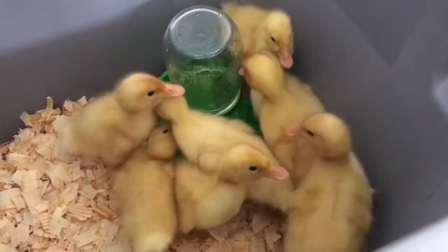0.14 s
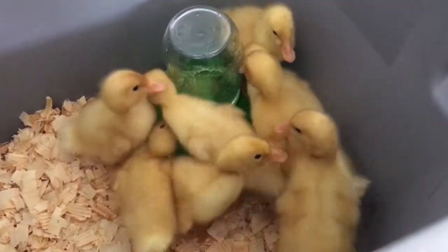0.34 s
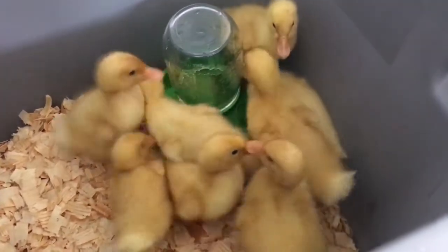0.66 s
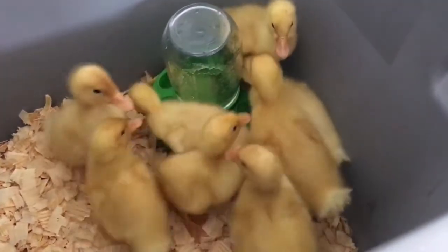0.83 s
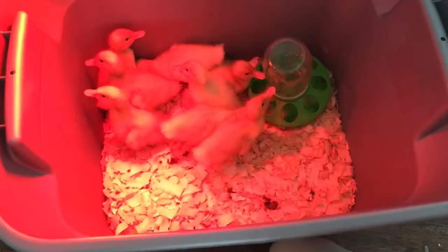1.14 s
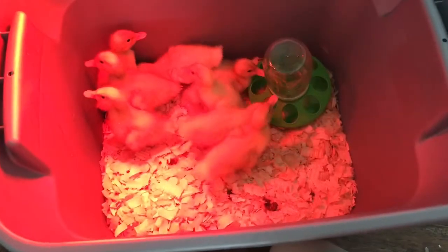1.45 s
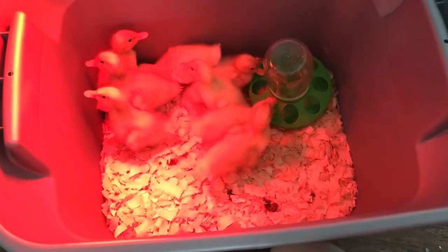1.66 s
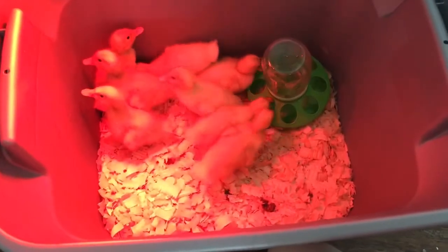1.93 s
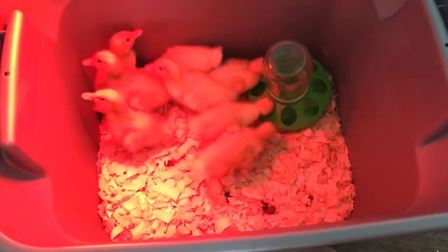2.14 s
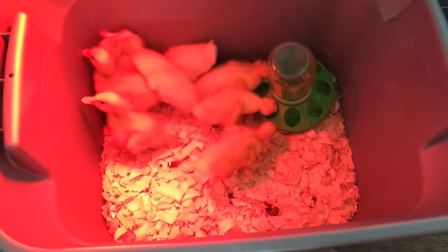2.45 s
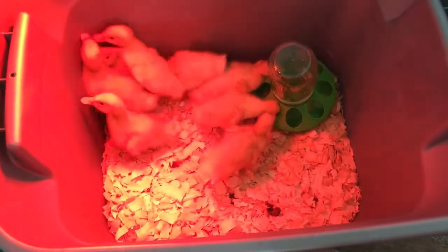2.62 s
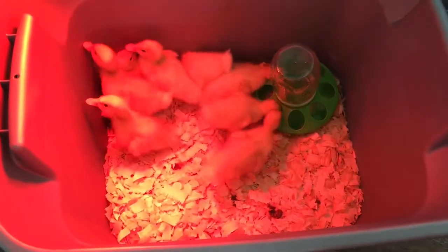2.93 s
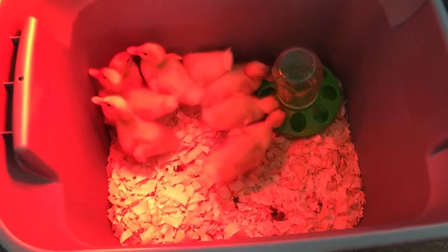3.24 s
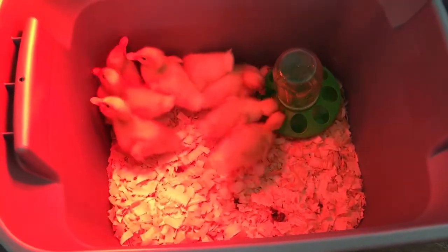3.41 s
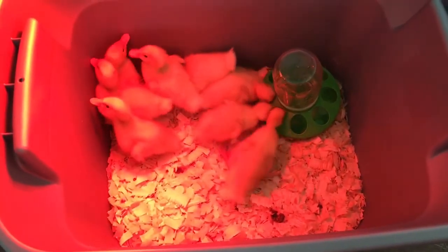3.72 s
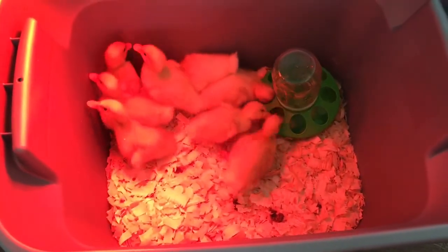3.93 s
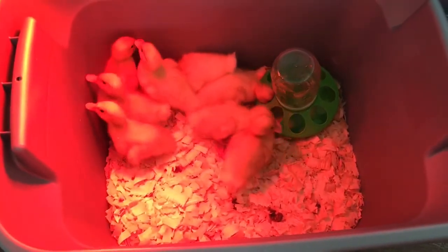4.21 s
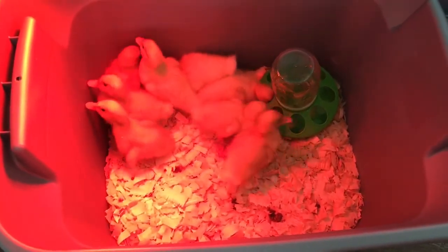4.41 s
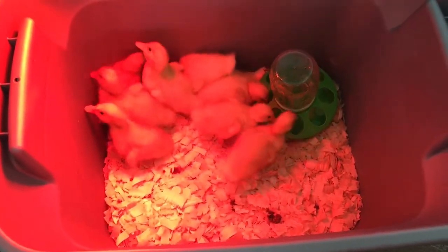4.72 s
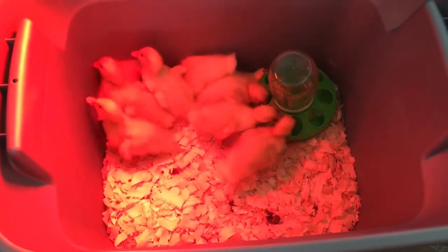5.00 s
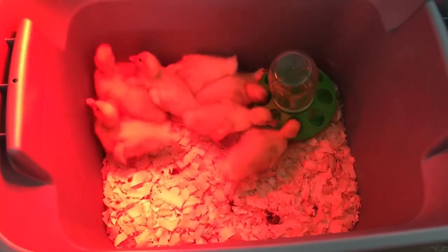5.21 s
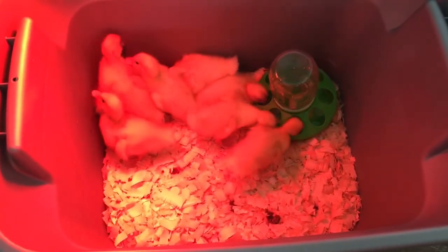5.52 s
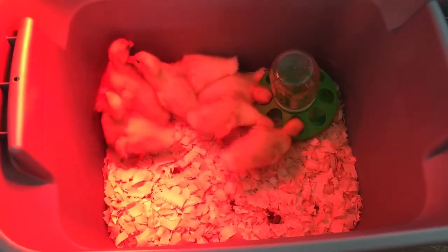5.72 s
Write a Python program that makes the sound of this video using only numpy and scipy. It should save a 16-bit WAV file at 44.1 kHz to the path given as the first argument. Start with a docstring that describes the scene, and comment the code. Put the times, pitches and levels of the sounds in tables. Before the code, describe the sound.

Close view into a plastic tub of ducklings. About nine short, high peeps come quickly in the first second, then it falls nearly quiet with faint rustles. A bright, loud peep sounds around 2.5 seconds among weaker ones, with bill taps on a drinker. Afterwards small snaps, pecks and soft foot bumps dominate, over faint hiss and low rumble.

```python
"""Ducklings peep, each call one short arch of pitch, while they shuffle on wood shavings in a plastic tub.
The calls are swept harmonics that flare at a bill resonance. Bills tap a drinker (ringing modes),
feet thump the tub floor (sinking booms), shavings swish (grains of noise), and shavings snap and
bills peck the tub wall (rung bursts).
Tub echoes and a diffuse tail surround calls and knocks, over faint hiss and a rumble wandering in level."""
import sys
import numpy as np
from scipy import signal
from scipy.fft import rfft, irfft
from scipy.io import wavfile
from scipy.ndimage import uniform_filter1d

SR = 44100
rng = np.random.default_rng(int(sys.argv[2]) if len(sys.argv) > 2 else 0)


def to_wav(sig):
    """Store sig (one row per channel, or 1-D mono) as 16-bit WAV at the path in sys.argv[1].

    Samples outside -1..1 are clipped; the rate is SR.
    """
    pcm = np.clip(np.atleast_2d(sig), -1, 1) * 32767
    pcm = np.round(pcm).astype(np.int16)
    wavfile.write(sys.argv[1], SR, pcm.T)  # frames by channels


N = 258426

# All table levels are relative: the functions add trims, and tone tables give only a spectral shape.
# spectrum of the dry shavings, also lent to the breath in a call: (frequency [Hz], level [dB])
SHAVING_TONE = [(300, 4.5), (900, 9.5), (2000, 9), (3700, 5.5), (5000, 3), (6400, 5), (9000, 3),
                (10400, -1.5), (12000, 0.5), (16000, -4.5)]
# notes of the chips, large to small: (frequency [Hz])
CHIP_NOTES = [1300, 2100, 3100, 4200, 5300, 6500, 8000, 9600, 12500]
# shavings rustling as the brood shifts: (time [s], level [dB])
RUSTLE_CURVE = [(0.0, -58.5), (0.23, -66.5), (0.42, -58.5), (0.7, -56.5), (0.86, -49.5), (1.01, -60.5),
                (1.05, -76.5), (1.39, -63), (1.7, -70), (2.17, -71.5), (2.28, -62), (2.77, -60),
                (3.23, -66), (3.4, -60.5), (4.15, -64), (4.72, -60.5), (5.4, -65.5), (5.86, -62.5)]


def amp(db):
    """Decibels to gain."""
    return 10 ** (np.asarray(db) / 20)


def unit(x):
    """Scales to rms 1."""
    return x / np.sqrt(np.mean(x ** 2) + 1e-20)


def unit_hit(x):
    """Scales a hit so that its loudest 4 ms have rms 1."""
    power = uniform_filter1d(x ** 2, size=176, mode="constant")
    return x / np.sqrt(power.max() + 1e-20)


def read(points, hz):
    """Reads a table of (frequency [Hz], value) on a log-frequency axis."""
    f, value = np.transpose(points)
    return np.interp(np.log(hz + 1), np.log(f + 1), value)


def follow(curve):
    """Turns a curve of (time [s], level [dB]) into a gain for every sample."""
    return amp(np.interp(np.arange(N) / SR, *np.transpose(curve)))


def colour(x, tone):
    """Shapes the spectrum of x by a (frequency [Hz], level [dB]) table, at rms 1."""
    gain = amp(read(tone, np.fft.rfftfreq(len(x), 1 / SR)))
    return unit(irfft(rfft(x) * gain, len(x)))


def ring(x, hz, width_hz):
    """One resonance of peak gain 1."""
    b, a = signal.iirpeak(min(hz, SR * .45), hz / width_hz, SR)
    return signal.lfilter(b, a, x)


def add(mix, s, sound):
    """Adds a sound into the mix at time s [s]."""
    part = mix[max(round(s * SR), 0):][:len(sound)]
    part += sound[:len(part)]


def grains(per_s, spread_db, t60, bed):
    """Noise in tiny dying bursts of uneven size, over an even bed of noise."""
    size_db = np.minimum(spread_db * rng.exponential(1, N), 13)
    size = amp(size_db) * (rng.random(N) < per_s / SR)
    decay = amp(-120 / (t60 * SR))  # power falls 60 dB in t60 seconds
    power = signal.lfilter([1], [1, -decay], size ** 2)
    return np.sqrt(power / power.mean() + abs(bed)) * rng.standard_normal(N)


def peep(row, jitter=0.075, flutter_db=6, rasp=0.94, breath_db=-24, third_db=-3, slack_db=-21,
         fade=0.041, swell_db=4, bill_sag_hz=150):
    """The syrinx sweeps up and down; the note flares as it passes the resonance of the open bill."""
    # what the throat and bill let through: (frequency [Hz], level [dB])
    throat = [(1700, -17), (2400, -8.5), (2900, -9.5), (3450, -2), (3700, -4), (4000, -19), (4700, -16.5),
              (6000, -4.5), (7200, -12.5), (9000, -24), (11500, -20), (15000, -45)]
    (_, length, top, arch, start_hz, top_hz, end_hz, level_db,
     bill_hz, bill_width_hz, overtone_db, rough) = row
    u = np.linspace(0, 1, int(length * SR))  # progress through the call
    top = np.clip(top, .05, .95)

    waver, flutter = (unit(uniform_filter1d(z, size=70))[:len(u)]
                      for z in rng.standard_normal((2, SR // 4)))
    grit = unit(uniform_filter1d(rng.standard_normal(SR // 4), size=20))[:len(u)]
    breath = colour(rng.standard_normal(SR // 4), SHAVING_TONE)[:len(u)]

    # the pitch arch, roughened by the waver
    from_top = np.where(u < top, (top - u) / top, (u - top) / (1 - top))
    foot_hz = np.where(u < top, start_hz, end_hz)
    hz = top_hz - (top_hz - foot_hz) * from_top ** arch
    phase = 2 * np.pi * np.cumsum(hz * (1 + jitter * rough * waver)) / SR

    # the bill closes a little during the call, so its resonance falls
    off_hz = hz - bill_hz + bill_sag_hz * (u - .5)
    flare_db = -20 * np.log10(1 + (2 * off_hz / bill_width_hz) ** 2)
    bright_db = overtone_db + slack_db * from_top  # slack membranes give fewer overtones
    harmonics_db = [flare_db, bright_db, bright_db + third_db]
    voice = sum(amp(read(throat, k * hz) + db) * np.sin(k * phase)
                for k, db in enumerate(harmonics_db, 1))
    voice = voice * (1 + rasp * rough * grit) + amp(breath_db) * rough * breath

    # each call swells from start to end
    loudness_db = level_db + swell_db * (u - 1.5) + flutter_db * rough * flutter
    return voice * amp(loudness_db) * signal.windows.tukey(len(u), fade)


def peeps():
    """All the calls of the brood, each a pitch arch placed at its own moment."""
    # one row a peep, or a faint upper note that rides on one:
    # (time [s], length [s], place of the top [0-1], roundness of the arch [1 = pointed],
    #  start pitch [Hz], top pitch [Hz], end pitch [Hz], level [dB],
    #  bill resonance [Hz], its width [Hz], overtones [dB], roughness [0-1])
    calls = [ (0.000, 0.062, 0.37, 1.42, 3000, 3380, 1720, -21, 3049, 1077, -14.5, 0.034),
             (0.003, 0.018, .6, 1.8, 3960, 4160, 4050, -28.5, 4100, 900, -20, .08),
             (0.172, 0.067, 0.57, 1.71, 2123, 3647, 1810, -14.5, 3670, 910, -16, 0.028),
             (0.277, 0.059, 0.41, 1.7, 2064, 3830, 2116, -16, 2720, 844, -22, 0.025),
             (0.302, .016, .1, 1.3, 4500, 4500, 3900, -36, 4250, 1100, -20, .1),
             (0.448, .06, .41, 1.4, 2210, 3870, 2035, -15.5, 2860, 480, -24, 0.12),
             (0.645, 0.041, .95, 2, 3330, 4420, 4350, -26, 4330, 1290, -10.5, .1),
             (0.659, 0.066, 0.32, 2.3, 2410, 3560, 2440, -22.5, 3100, 1500, -15, 0.093),
             (0.852, 0.06, 0.5, 1.986, 2498, 3710, 2220, -18.5, 3250, 963, -13, .12),
             (2.391, 0.057, 0.36, 1.04, 2100, 3686, 2210, -28.5, 2934, 1100, -9, 0.38),
             (2.544, .055, 0.43, 1.4, 2297, 4333, 2375, -11.5, 3890, 1300, -23, 0.18),
             (2.720, 0.074, 0.37, 0.98, 2180, 3590, 1880, -30.5, 2840, 900, -4.5, 0.27),
             (2.880, 0.069, 0.4, 1.43, 1897, 3645, 1990, -30.5, 2930, 1200, -17, 0.19),
             (3.282, 0.0615, 0.73, 2.2, 1894, 3456, 1870, -30, 2560, 2420, -20, .05),
             (3.445, 0.051, 0.52, 2.06, 1900, 3480, 1730, -28, 2900, 2410, -15, .08),
             (5.07, 0.062, 0.79, 2.14, 2113, 3416, 2444, -25, 3740, 1000, -22, 0.12)]
    out = np.zeros(N)
    for row in calls:
        add(out, row[0], peep(row))
    return out


def snap(db, hz, bright_db, crack_db, width=0.24, treble_hz=6500, top_hz=11000, low_hz=1500,
         crack_hz=4600, splinter_db=-19, splinter_t60_s=0.025, rebound=0.85, hard_db=-26.0, soft=1.0):
    """A sharp hit, a rebound and a noisy tail ring one note; harder hits knock the tub wall more."""
    # notes of the stiff tub wall: (frequency [Hz], width [Hz], level [dB])
    wall_notes = [(2215, 124, -3), (3350, 170, -1)]
    t = np.arange(SR // 10) / SR
    burst = rng.standard_normal(len(t)) * amp(splinter_db - 60 * t / splinter_t60_s)
    burst[round(.0005 * SR)] += 1  # the sharp hit
    burst[round(rng.uniform(.0012, .002) * SR)] += rebound

    note = unit_hit(ring(ring(burst, hz, width * hz), hz, 2 * width * hz))
    crack_band = signal.butter(2, [low_hz, crack_hz], "band", fs=SR, output="sos")
    crack = unit_hit(signal.sosfilt(crack_band, burst))
    spray_band = signal.butter(1, [treble_hz, top_hz], "band", fs=SR, output="sos")
    spray = unit_hit(signal.sosfilt(spray_band, burst))
    wall = unit_hit(sum(amp(note_db) * ring(ring(burst, f, w), f, 4 * w)
                        for f, w, note_db in wall_notes))

    wall_gain = amp(soft * (db - hard_db))  # grows with the strength of the hit
    hit = note + wall_gain * wall + amp(crack_db) * crack + amp(bright_db) * spray
    return amp(db) * unit_hit(hit)


def snaps(level_db=-3, small_db=11, small_crack_db=-3, spread_db=3.0, small_treble_db=-8,
          treble_spread_db=8, count=20):
    """Shavings snap and bills peck the tub wall at set times; small snaps by chance follow the rustle."""
    # the louder snaps, and bill pecks on the tub wall (at 4.698, 4.722 and 4.877 s):
    # (time [s], level [dB], ring [Hz], treble [dB], broad crack [dB])
    loud_hits = [(0.393, -45.5, 3400, 2, 6), (0.73, -36, 3470, -22, 1), (0.7872, -32.5, 1753, -35, 0),
                 (1.321, -48.5, 1660, 13, -9), (1.7698, -47, 2706, 2, 2.5), (2.2533, -45, 1740, -26, -4.5),
                 (2.2888, -41, 2080, -26.5, -2), (2.3152, -43, 1950, 2, -5), (2.328, -41, 3400, -20, -10),
                 (2.405, -37.5, 3220, -31, 17), (2.4375, -44, 2630, 0, -17.5),
                 (2.4605, -42.5, 3000, -20.5, -2), (2.5118, -38.5, 2270, -32, -12),
                 (2.8183, -26.5, 3660, 14.5, 20), (2.8777, -42, 2490, 11, -7), (2.947, -40, 11830, 2, 3),
                 (3.0245, -47.5, 6700, -12, -7), (3.1002, -48, 4200, -14, -13),
                 (3.3866, -46, 2150, -27, -8), (3.4268, -43.5, 2600, 5, 5), (3.716, -41, 2500, 12, 14),
                 (3.773, -35.5, 4700, -6, 2.5), (3.8486, -36, 2160, -29, 20.5), (3.8531, -38, 6200, -6, -5),
                 (4.0632, -40, 12300, -35, -2), (4.119, -34.5, 3550, -25, 9), (4.2452, -34, 3450, 0.5, 4),
                 (4.317, -39.5, 6440, -20, -20), (4.3767, -38.5, 4900, -15, -6),
                 (4.6465, -38.5, 3910, -6, -2), (4.698, -23, 2760, -16, -4.5), (4.722, -36, 2340, -32, 9.5),
                 (4.782, -44, 2130, 2, -7), (4.877, -41.5, 2130, -19, -22), (5.0547, -45, 1970, 7, 7),
                 (5.1381, -29, 5680, -7.5, -1.5), (5.4721, -44, 5240, -12, -13),
                 (5.5803, -48, 13400, -15, -25), (5.7472, -40, 5900, 0, -1.5),
                 (5.845, -47, 12200, -18, -14), (5.8554, -41.5, 6000, -1, 0.5)]
    out = np.zeros(N)
    for s, db, hz, bright_db, crack_db in loud_hits:
        add(out, s, snap(db + level_db, hz, bright_db, crack_db))

    times, rustle_db = np.transpose(RUSTLE_CURVE)
    large_chips = CHIP_NOTES[:len(CHIP_NOTES) // 2]
    for slot in range(count):  # one small snap somewhere in each slot
        s = (slot + rng.random()) / count * N / SR
        size, shine = rng.standard_normal(2)
        db = np.interp(s, times, rustle_db) + small_db + spread_db * size
        treble_db = small_treble_db + treble_spread_db * shine
        add(out, s, snap(db, rng.choice(large_chips), treble_db, small_crack_db))
    return out


def taps(level_db=0, tilt=0.75, even_db=-5, scatter=0.053):
    """A bill strikes the plastic drinker; a harder contact favours the upper modes."""
    # bills tapping: (time [s], level [dB], brightness [dB])
    strikes = [(0.067, -47, -6), (0.788, -40.5, -2), (0.797, -38, -8), (0.815, -36, -12), (0.822, -39, -19),
               (1.617, -46.5, 6), (2.236, -37.5, -7), (2.27, -42, -6.5), (2.3, -44, -13), (2.72, -43.5, -9),
               (2.779, -39, -5), (2.974, -42, -9.5), (2.993, -44.5, -10), (3.155, -50.5, -2),
               (3.415, -35, -26), (3.679, -44.5, 1), (4.313, -46.5, -17), (4.794, -44.5, -1),
               (5.128, -42, 5.5), (5.284, -48, -12), (5.438, -48.5, -6)]
    # what the drinker rings with, before scatter: (frequency [Hz], level [dB], t60 [s])
    drinker = [(346, -10.5, 0.023), (585, 4.5, 0.029), (689, 5, 0.038), (892, 3, 0.023), (1120, 8, 0.03),
               (1473, 18.5, 0.0062), (1870, -1, 0.066), (3040, 12, 0.0011)]
    out, t = np.zeros(N), np.arange(SR // 10) / SR
    hz, mode_db, t60 = np.transpose(drinker)[:, :, None]
    for s, db, bright_db in strikes:
        detune, place = rng.standard_normal((2, len(hz), 1))
        tilt_db = tilt * (bright_db - even_db) * np.log2(hz / hz.mean())
        height = np.sign(place) * amp(mode_db + tilt_db)  # each mode starts up or down by chance
        tone = np.sin(2 * np.pi * hz * (1 + scatter * detune) * t)
        modes = height * amp(-60 * t / t60) * tone
        add(out, s, amp(db + level_db) * unit_hit(modes.sum(0)))
    return out


def thumps(level_db=0, rise_s=0.0064, scuff_db=-6, sag=0.32, sag_s=0.009):
    """A soft foot pushes the tub floor, which booms briefly and sinks in pitch as the push spreads."""
    # feet and bodies bumping the tub: (time [s], level [dB], settled pitch [Hz], t60 [s])
    bumps = [(0.133, -40.5, 83.6, 0.12), (0.216, -43.5, 232, 0.023), (0.597, -45.5, 106, 0.18),
             (0.744, -51, 135, 0.1), (0.889, -45.5, 126, 0.185), (1.368, -53, 94, 0.14),
             (1.618, -50, 168, 0.067), (1.742, -46, 125, 0.021), (3.418, -43, 269.6, .12),
             (3.629, -47.5, 201.5, 0.062), (4.045, -47, 188, 0.052), (4.094, -47, 120, 0.035),
             (4.174, -47.5, 206.4, .21), (4.22, -47.5, 216, 0.16), (4.315, -40, 207, 0.044),
             (4.475, -48.5, 169, 0.15), (4.534, -49, 215, 0.21), (4.623, -45.5, 198.5, 0.19),
             (4.8, -46, 197, .3), (5.287, -40.5, 167, 0.083)]
    out, t = np.zeros(N), np.arange(SR // 4) / SR
    for s, db, hz, t60 in bumps:
        turns = hz * np.cumsum(1 + sag * np.exp(-t / sag_s)) / SR
        boom = np.sin(2 * np.pi * turns)
        scuff = unit(ring(rng.standard_normal(len(t)), hz, hz))
        push = (1 - np.exp(-(t / rise_s) ** 2)) * amp(-60 * t / t60)
        add(out, s, amp(db + level_db) * unit_hit((boom + amp(scuff_db) * scuff) * push))
    return out


def crackle(per_s=22, spread_db=5, t60=0.055, width=0.17, shared_db=-3):
    """Chips of every size tick on their own notes, over a broad crunch."""
    chips = 0
    for hz in CHIP_NOTES:
        ticks = grains(per_s, spread_db, t60, bed=0.035)
        rung = ring(ring(ticks, hz, width * hz), hz, 2 * width * hz)
        chips = chips + unit(rung) * np.sqrt(hz)
    crunch = grains(per_s=96, spread_db=3.5, t60=0.0153, bed=0.7)
    return colour(unit(chips) + amp(shared_db) * crunch, SHAVING_TONE)


def stirring(feet_db=1, bills_db=0, rustle_db=3, swish_db=0):
    """Countless small steps, nibbles and shifting chips, with louder brushes through the bedding."""
    # feet pattering on the tub floor: (time [s], level [dB])
    feet_curve = [(0.0, -64), (0.38, -70), (0.87, -59), (1.04, -67), (2.2, -66.5), (2.44, -54.5),
                  (2.7, -63), (3.23, -62), (3.54, -54), (3.72, -64.5), (4.14, -54.5), (4.6, -56),
                  (5.03, -60), (5.86, -63.5)]
    # bills dabbling at the drinker: (time [s], level [dB])
    dabble_curve = [(0.0, -55.5), (0.23, -75), (0.5, -66), (0.98, -63), (1.05, -75.5), (1.39, -66),
                    (1.65, -69.5), (2.15, -62), (2.25, -55), (2.63, -55), (2.97, -64), (3.55, -59.5),
                    (4.2, -60), (4.72, -57.5), (5.1, -63), (5.86, -59.5)]
    # bodies brushing through the shavings: (peak time [s], length [s], level [dB])
    swishes = [(0.437, 0.017, -46), (0.596, 0.017, -41), (0.737, .009, -42.5), (1.005, 0.046, -64.5),
               (1.195, 0.048, -56.5), (1.283, 0.0152, -56.5), (1.366, 0.034, -52.5), (1.912, 0.041, -52.5),
               (2.055, 0.019, -55.5), (2.589, .007, -42.5), (2.627, 0.045, -50.5), (2.755, 0.015, -45.5)]
    # spectra of the pattering and of the dabbling: (frequency [Hz], level [dB])
    floor_tone = [(30, -22), (70, -7), (130, 4), (200, 1), (250, -3), (300, -7), (380, -2.5), (600, -17.5),
                  (1500, -88)]
    dabble_tone = [(200, -55), (450, 3), (680, 6), (850, 3.5), (1400, 7), (2200, 3.5), (3300, -7.5),
                   (5000, -10.5), (10000, -26)]

    t = np.arange(N) / SR
    swish = sum(amp(db) * np.exp(-2 * ((t - at) / length) ** 2) for at, length, db in swishes)
    steps = colour(grains(per_s=29, spread_db=2.0, t60=0.097, bed=0.9), floor_tone)
    nibbles = colour(grains(per_s=64, spread_db=6.5, t60=0.15, bed=0.084), dabble_tone)
    out = amp(feet_db) * follow(feet_curve) * steps
    out += amp(bills_db) * follow(dabble_curve) * nibbles
    out += amp(rustle_db) * follow(RUSTLE_CURVE) * crackle()
    brush = colour(grains(per_s=1200, spread_db=2, t60=0.0025, bed=0.35), SHAVING_TONE)
    return out + amp(swish_db) * swish * brush


def tub(x):
    """The plastic tub lends its hollow notes to whatever stirs in it."""
    # resonances of the tub: (frequency [Hz], width [Hz], level [dB])
    hollow_notes = [(214, 75, -8.5), (374, 14, -9), (522, 25.7, -4), (672, 33, -6), (1064, 15, -9),
                    (1263, 8.6, -22), (2110, 31, -17)]
    return x + sum(amp(db) * ring(x, hz, width) for hz, width, db in hollow_notes)


def space(x, walls_db, room_db):
    """Quick echoes off the tub walls, and the room's diffuse tail, whose decay varies with frequency."""
    # decay of the room: (frequency [Hz], t60 [s])
    room_decay = [(100, 0.27), (500, 0.36), (2000, 0.31), (3500, 0.3), (8000, 0.054), (16000, 0.18)]
    # echoes off the tub: (delay [s], level [dB])
    echoes = [(.0013, -68), (.0024, -33), (.0041, -3.5), (.0066, -5.5), (0.012, -13)]
    hz, t, z = signal.stft(rng.standard_normal(SR // 2), SR, nperseg=256)
    decay = amp(-60 * t / read(room_decay, hz)[:, None])
    tail = signal.istft(z * decay, SR, nperseg=256)[1]
    tail *= np.minimum(np.arange(len(tail)) / SR / 0.0026, 1)  # fades in over 2.6 ms
    response = amp(room_db) * tail / np.linalg.norm(tail)
    response[0] += 1  # the direct sound
    for delay, db in echoes:
        response[round(delay * SR)] += amp(db + walls_db)
    return signal.fftconvolve(x, response)[:N]


def background(hiss_db=-67, rumble_db=-1):
    """Faint steady hiss of still air and a low rumble that wanders in level, both shaped noise."""
    # spectra of the still air and of the rumble: (frequency [Hz], level [dB])
    hiss_tone = [(30, -7.5), (55, 8.5), (120, -6), (300, -15), (1000, -35), (2000, -25.5), (4000, -26),
                 (9000, -26.5), (16000, -28)]
    rumble_tone = [(15, -41), (30, -16), (48, 1), (62, 7), (85, 2), (130, -2.5), (250, -47)]
    # how the rumble wanders: (time [s], level [dB])
    rumble_curve = [(0.0, -69), (0.6, -57.5), (1.1, -71), (1.4, -60), (1.8, -69), (2.55, -56), (3.1, -83),
                    (3.6, -65.5), (4.4, -62.5), (4.8, -64), (5.2, -72), (5.86, -68)]
    air, low = rng.standard_normal((2, N))
    hiss = amp(hiss_db) * colour(air, hiss_tone)
    return hiss + amp(rumble_db) * follow(rumble_curve) * colour(low, rumble_tone)


def scene():
    """The brood in its tub: calls, knocks and stirring over the background."""
    calls = space(peeps(), walls_db=-11.5, room_db=-17.0)
    knocks = space(snaps() + taps() + thumps(), walls_db=-21.5, room_db=-13.5)
    bedding = amp(-1.5) * tub(knocks + stirring())
    return (calls + bedding + background())[None]


def record(dry):
    """Limits the band with a steep low-pass at the upper edge."""
    edge_hz = 16000
    lowpass = signal.firwin(511, edge_hz, window=("kaiser", 9), fs=SR)
    return signal.oaconvolve(dry, lowpass[None], "same")


dry = scene()
out = record(dry)
to_wav(out)
```